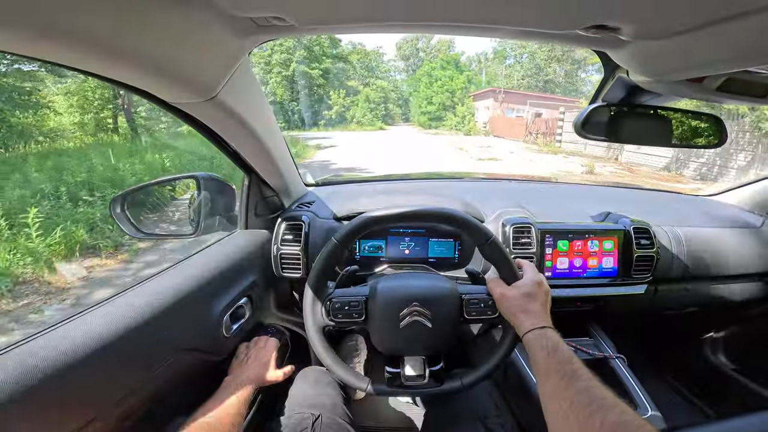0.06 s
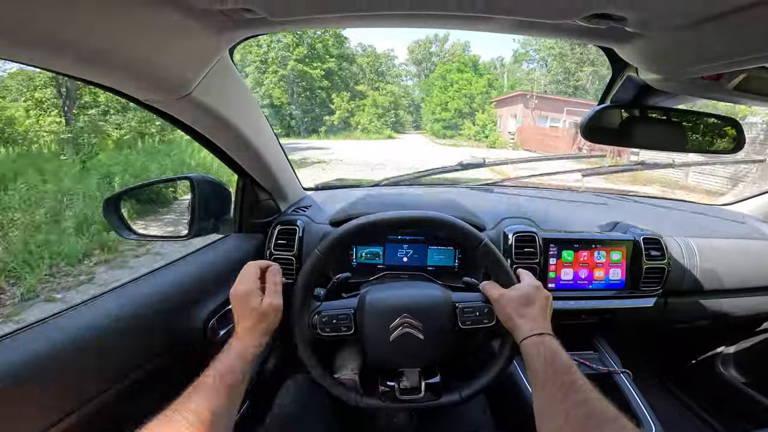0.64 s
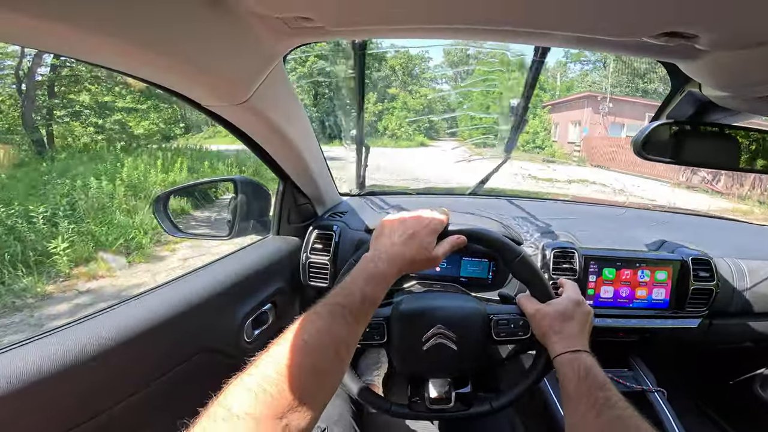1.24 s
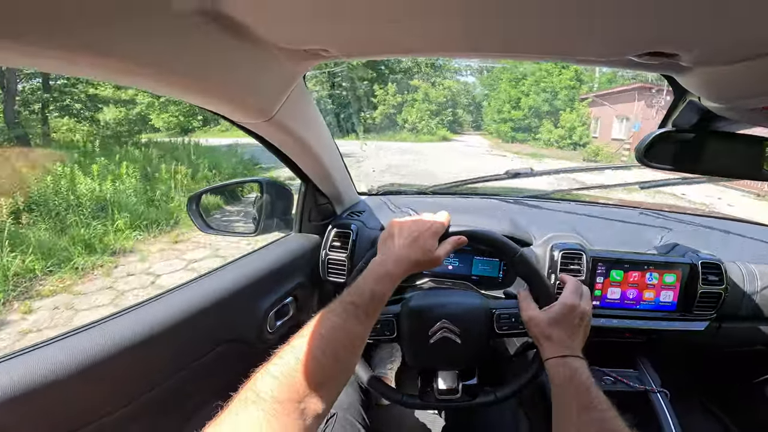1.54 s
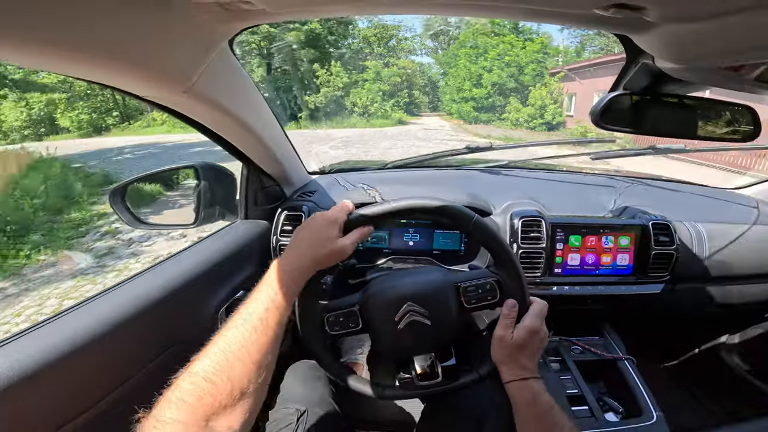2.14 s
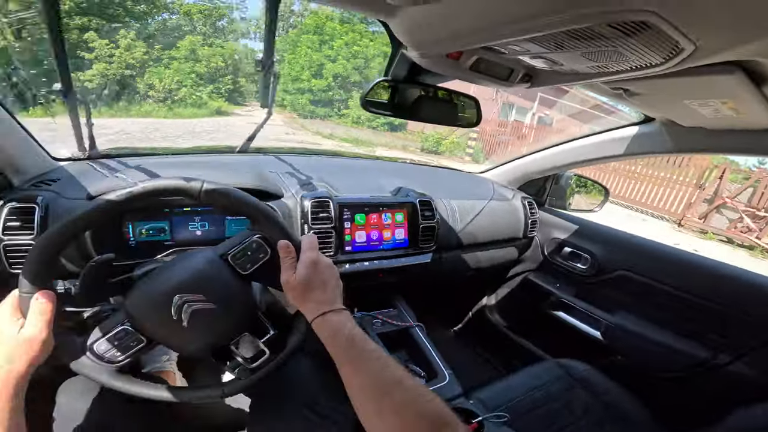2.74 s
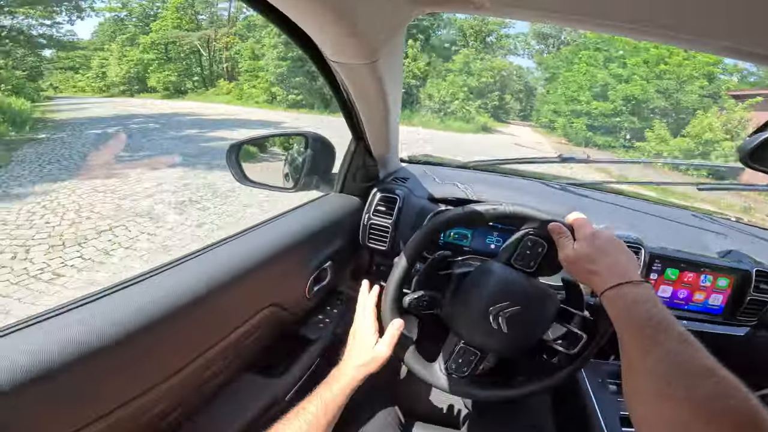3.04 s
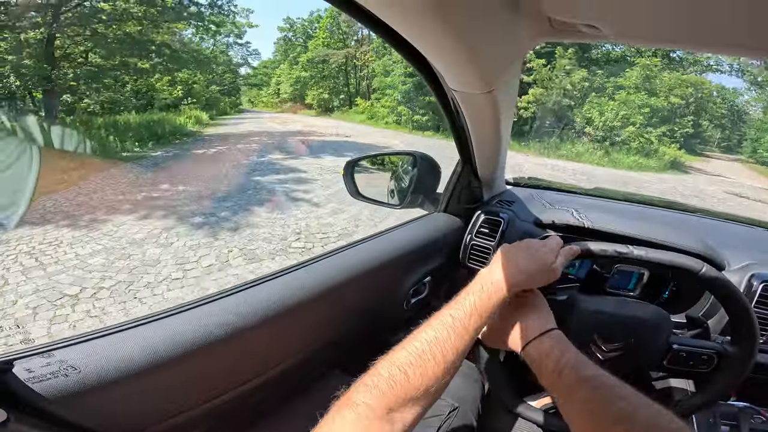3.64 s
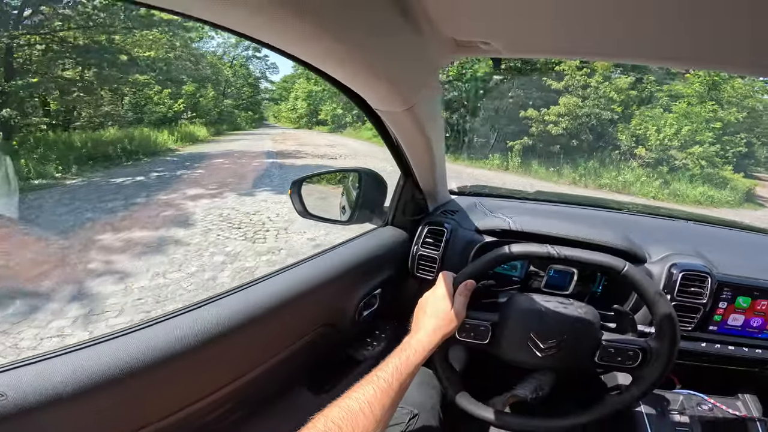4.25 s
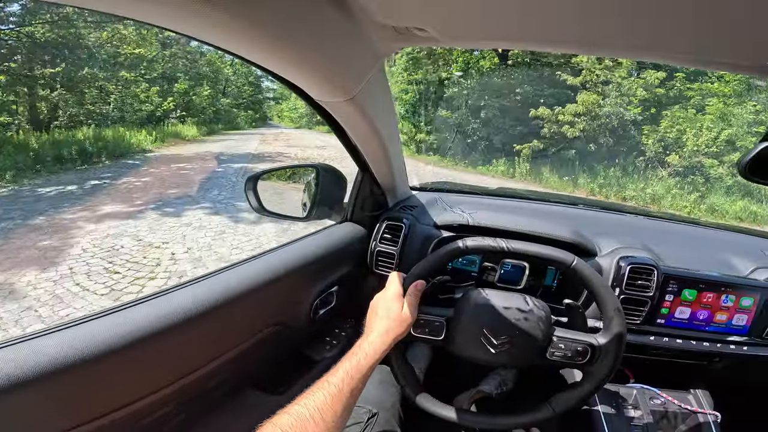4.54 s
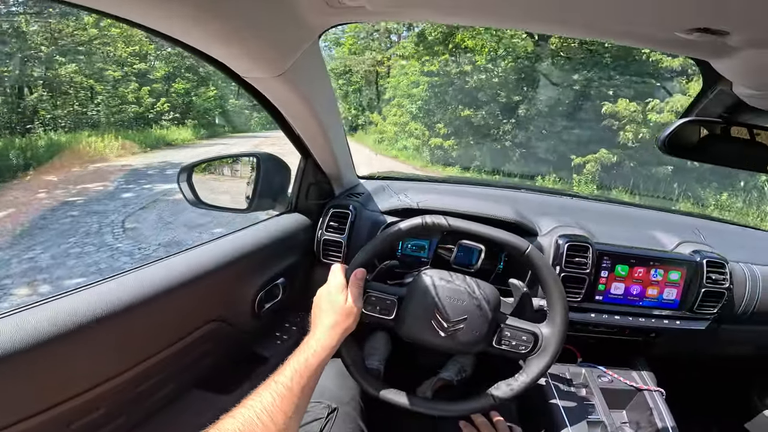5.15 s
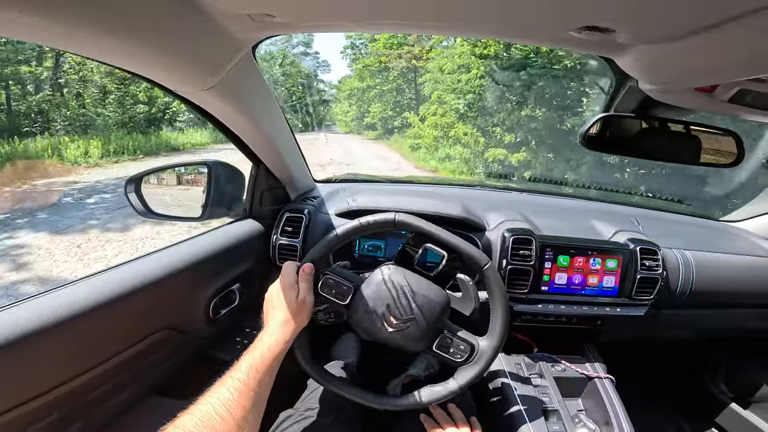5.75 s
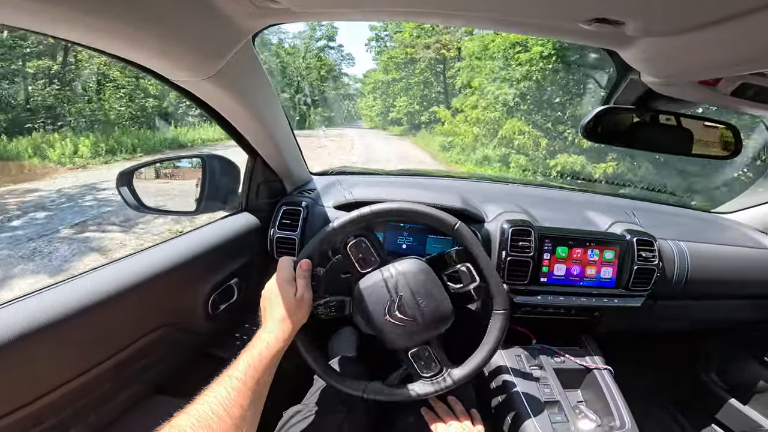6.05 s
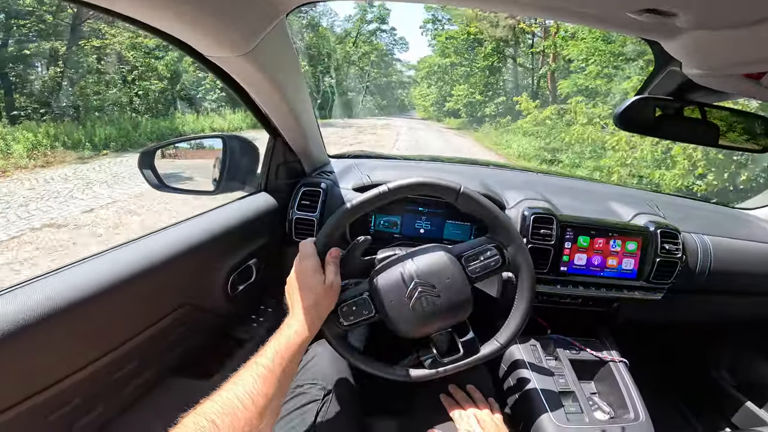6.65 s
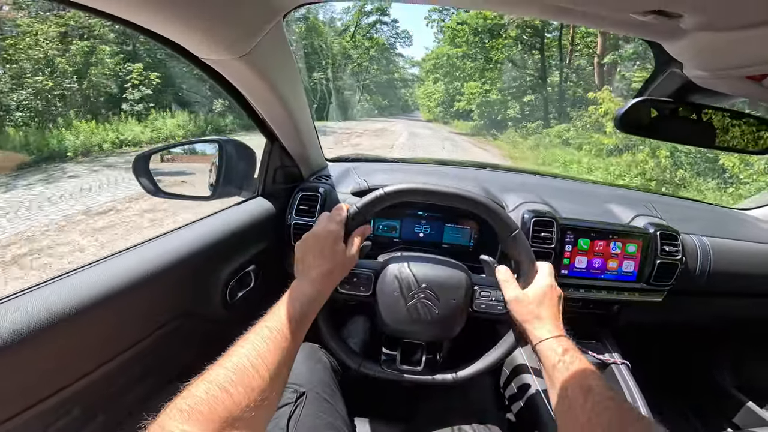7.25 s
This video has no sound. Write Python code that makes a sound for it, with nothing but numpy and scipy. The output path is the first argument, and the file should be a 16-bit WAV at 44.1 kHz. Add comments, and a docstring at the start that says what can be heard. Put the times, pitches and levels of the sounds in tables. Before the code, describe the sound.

Heard from the driver's seat, a car rolls slowly over cobblestones, the tyres drumming and pattering above a deep, heaving body boom. Dull suspension knocks and small plastic clicks and rattles come at the start and return here and there. Midway the turn indicator clicks six times in an even tock-tick. Hands slide softly over the leather steering wheel on and off, and a last bump shakes the trim near the end.

```python
"""Car turning slowly on cobbles, from the driver's seat.

Stones drum through the tyres, knock the suspension and shake the body into a deep boom.
Plastic trim clicks and rattles. The leather steering wheel slides through the driver's hands.
The turn indicator clicks six times behind the dashboard."""
import sys
import numpy as np
from scipy import signal
from scipy.fft import rfft, irfft
from scipy.io import wavfile
from scipy.ndimage import uniform_filter1d, minimum_filter1d

SR = 44100
rng = np.random.default_rng(int(sys.argv[2]) if len(sys.argv) > 2 else 0)


def output_pcm(signal):
    """Save a mono or channel-first signal as 16-bit PCM at the path in sys.argv[1].

    Samples are clipped to [-1, 1] before scaling.
    """
    pcm = np.clip(np.atleast_2d(signal).T, -1, 1) * 32767
    wavfile.write(sys.argv[1], SR, np.round(pcm).astype(np.int16))


N = 321489
TIME, FREQS = np.arange(N) / SR, np.fft.rfftfreq(N, 1 / SR)


def amp(db):
    """Decibels to gain."""
    return 10 ** (np.asarray(db) / 20)


def unit(x):
    """Scale to rms 1."""
    return x / np.sqrt(np.mean(x ** 2) + 1e-20)


def at_hz(points, hz):
    """Interpolate a spectrum over log frequency."""
    f, value = np.transpose(points)
    return np.interp(np.log(hz + 1), np.log(f + 1), value)


def curves(table):
    """Interpolate each column over time."""
    s, *columns = np.transpose(table)
    return [np.interp(TIME, s, c) for c in columns]


def add(mix, s, sound):
    """Mix a sound in at time s."""
    part = mix[..., max(round(s * SR), 0):][..., :sound.shape[-1]]
    part += sound[..., :part.shape[-1]]


def colour(x, spectrum):
    """Filter by a spectrum; rms 1."""
    return unit(irfft(rfft(x) * amp(at_hz(spectrum, FREQS)), N))


def band(centre_hz, octaves, size):
    """Two noise channels through one resonance; rms 1."""
    detune = np.log2((np.fft.rfftfreq(size, 1 / SR) + 1) / centre_hz) / octaves
    return unit(irfft(rfft(rng.standard_normal((2, size))) / (1 + detune ** 4), size))


def wander(rate_hz):
    """Slow random drift; rms 1."""
    return unit(irfft(rfft(rng.standard_normal(N)) * np.exp(-(FREQS / rate_hz) ** 2), N))


def grains(per_s, spread_db):
    """Two trains of tiny, uneven impacts."""
    strength = amp(spread_db * np.minimum(rng.exponential(1, (2, N)), 4))
    return unit(strength * rng.standard_normal((2, N)) * (rng.random((2, N)) < per_s / SR))


def burst(noise, envelope):
    """Enveloped noise, each channel at the envelope's energy."""
    shaped = noise * envelope
    return shaped * np.linalg.norm(envelope) / np.linalg.norm(shaped, axis=1, keepdims=True)


def steady(x, span_s):
    """Level out swells longer than span_s."""
    power = uniform_filter1d(x ** 2, int(span_s * SR) + 1)
    return x / np.sqrt(abs(uniform_filter1d(power, int(span_s * SR / 2) + 1)) + 1e-9)


def mode(t, hz, peak_s, steepness):
    """A resonance that swells to its peak and dies."""
    return (t / peak_s * np.exp(1 - t / peak_s)) ** steepness * np.sin(2 * np.pi * hz * t)


def swells(table, gain_db, size=16384):
    """One soft arch of band noise per row."""
    out, t = np.zeros((2, N)), (np.arange(size) - size / 2) / SR
    for s, length, db, centre_hz, octaves in table:
        inside = abs(t) < length / 2
        noise = unit(band(centre_hz, octaves, size)[:, inside])
        add(out, s - length / 2, amp(db + gain_db) * noise * np.cos(np.pi * t[inside] / length))
    return out


def gestures(table, attack_s, release_s, arch_db, rest_db):
    """Gain curve: each row rises, arches and dies back to a resting level."""
    power = np.full(N, amp(rest_db) ** 2)
    for start, length, db in table:
        rise = np.clip((TIME - start) / attack_s, 0, 1)
        edge = np.clip(2 * (TIME - start) / length - 1, -1, 1) ** 2
        release = np.exp(-np.maximum(TIME - start - length, 0) / release_s)
        power += (amp(db - arch_db * edge) * rise * release) ** 2
    return np.sqrt(power)


# tread hum: t/s, level/dB
HUM_LEVELS = [(0, -56.5), (0.9, -66.5), (2.2, -62.5), (2.5, -56.5), (3.1, -81.5), (4.6, -61.5),
              (5.0, -58.5), (6.0, -57), (7.29, -61.5)]

def tread_hum(centre_hz=600, octaves=0.16):
    """The tread's hollow hum comes and goes as the car pulls away."""
    level_db, = curves(HUM_LEVELS)
    return amp(level_db) * band(centre_hz, octaves, N)


# plastic click, for chatter and knocks: f/Hz, density/dB
CLICK_SPECTRUM = [(300, -25.5), (900, -9.5), (1700, -3), (2400, -2), (2900, 2.5), (4000, -2), (5500, -1.5),
                  (7600, -2), (10000, -11.5), (12500, -17), (14000, -42)]
# rattles: centre t/s, length/s, level/dB
RATTLES = [(0.232, 0.083, -65.5), (0.508, 0.18, -65.5), (7.22, 0.16, -70)]

def trim_chatter(ticks_per_s=900, ring_s=0.00097, dull_hz=4800, size=1024):
    """Loose plastic shakes after jolts: a soft crowd of briefly ringing ticks."""
    shake = sum(amp(db) * np.exp(-(2 * (TIME - s) / length) ** 2) for s, length, db in RATTLES)
    ring = rng.standard_normal((2, size)) * np.exp(-np.arange(size) / SR / ring_s)
    ticks = signal.oaconvolve(grains(ticks_per_s, spread_db=0.8), ring, axes=1)[:, :N]
    dulled = irfft(rfft(colour(ticks, CLICK_SPECTRUM)) / (1 + (FREQS / dull_hz) ** 2), N)
    return shake * unit(dulled)


# trim and wheel knocks: t/s, level/dB, crack t60/s, tilt/(dB/oct), ring f/Hz, ring re crack/dB
TRIM_KNOCKS = [(0.186, -59, 0.06, -9.5, 3900, -11), (0.2183, -53.5, 0.055, -3, 2070, 4),
               (0.226, -58, 0.05, -9, 2330, 4), (0.378, -66, 0.023, 2, 7260, -7),
               (0.451, -39.5, 0.029, -9, 2360, -1.5), (0.46, -56, 0.058, -6, 2280, -5),
               (0.504, -65, 0.044, 18, 3600, -2), (0.5364, -46.5, 0.044, -7.5, 4000, -6),
               (0.575, -65, 0.04, 6, 7160, -8), (2.135, -54, 0.044, -3, 3970, -9),
               (2.391, -52, 0.031, -21, 980, -3), (2.409, -46, 0.042, -18, 1490, -16),
               (2.440, -48.5, 0.025, -11, 1520, -3), (2.731, -52, 0.046, -7.5, 5600, -16),
               (2.849, -56.5, 0.03, 3, 8800, -5), (2.904, -58.5, 0.15, -11, 2196, -1),
               (2.928, -50.5, 0.029, -3, 3288, -17), (2.938, -49, 0.034, -3, 1740, -3),
               (3.11, -61, 0.015, 17, 11700, -10), (3.137, -58, 0.019, 0, 7410, -9),
               (3.96, -53, 0.024, -14, 1410, 1), (3.97, -51, 0.022, -11, 1360, 1),
               (4.492, -63, 0.04, -4, 5538, -8), (4.935, -61.5, 0.062, -1, 7410, -11),
               (4.999, -53, 0.055, -16, 1200, -4), (5.834, -45.5, 0.037, -7.5, 3900, -6.5),
               (5.914, -49, 0.024, -16, 1379, -10), (6.066, -56, 0.035, -14, 2882, -10),
               (6.392, -46, 0.033, -10.5, 2231, -6.5), (7.167, -53, 0.077, -13, 2673, -10),
               (7.178, -59, 0.022, -4.5, 6700, -17), (7.219, -56.5, 0.043, -8, 3484, 0),
               (7.255, -57, 0.037, -4, 3430, -9)]

def trim_knocks(ring_t60_s=0.052, ring_octaves=0.13, tail_db=-19, tail_t60_s=0.15, size=8192):
    """Plastic parts snap together: a crack, a narrow cluster of modes, a faint cabin tail."""
    rise_s, tilt_from_hz = 0.0001, 900
    out, t = np.zeros((2, N)), np.arange(size) / SR
    hz = np.fft.rfftfreq(size, 1 / SR) + 1
    for s, db, t60_s, tilt_db, ring_hz, ring_db in TRIM_KNOCKS:
        shape_db = at_hz(CLICK_SPECTRUM, hz) + tilt_db * np.log2(np.maximum(hz, tilt_from_hz) / ring_hz)
        noise = irfft(rfft(rng.standard_normal((2, size))) * amp(shape_db))
        fade = np.hypot(amp(-60 * t / t60_s), amp(tail_db - 60 * t / tail_t60_s))
        crack = burst(noise, fade)
        ring = amp(ring_db) * burst(band(ring_hz, ring_octaves, size), amp(-60 * t / ring_t60_s))
        add(out, s, amp(db) * (crack + ring) * (1 - np.exp(-t / rise_s)))
    return out


# rubs on the rim: centre t/s, length/s, level/dB, f/Hz, width/oct
RIM_RUBS = [(2.118, 0.05, -63, 3774, 0.52), (2.25, 0.14, -66, 4700, 0.55), (2.44, 0.2, -55, 970, 0.25),
            (2.42, 0.058, -66, 1800, 0.61), (2.742, 0.038, -65, 4360, 0.46), (2.797, 0.02, -52, 1480, 0.5),
            (2.92, 0.03, -58, 2800, 0.9), (3.82, 0.035, -65, 4600, 0.7), (3.98, 0.043, -68, 2000, 0.22),
            (4.09, 0.18, -60, 1411, 0.13), (4.09, 0.076, -60.5, 2030, 0.12), (5.12, 0.22, -68.5, 4300, 0.5),
            (6.22, 0.068, -59, 1780, 0.18), (6.33, 0.12, -58.5, 2900, 0.93), (6.42, 0.04, -65, 3300, 0.5),
            (6.5, 0.04, -65, 4440, 0.37), (7.21, 0.27, -75, 3280, 0.22)]

def rim_rubs():
    """Palms and cuffs rub and creak on the steering wheel."""
    return swells(RIM_RUBS, gain_db=-2)


# skin on leather: f/Hz, density/dB
SKIN_SPECTRUM = [(400, -31.5), (1200, -2.5), (2200, -6), (3200, -2), (4300, -3.5), (5500, -3), (7600, -4),
                 (8400, -10.5), (10300, -14), (11300, -12), (12000, -7), (12700, -12.5), (13700, -26.5)]
# wheel slides: start t/s, length/s, level/dB
WHEEL_SLIDES = [(1.6, 0.83, -66.5), (2.13, 0.33, -56.5), (2.8, 0.27, -66.5), (3.0, 0.65, -70.5),
                (3.72, 0.28, -62.5), (3.94, 0.32, -63), (4.32, 0.15, -71.5), (4.48, 0.14, -67.5),
                (4.97, 0.29, -63), (5.64, 0.62, -59), (6.02, 0.59, -60.5), (6.52, 0.33, -63.5)]

def hands(gain_db=-3.5, grip_db=0.88, air_hz=9000, snags_per_s=29, snag_s=0.005, scrape_hz=2800):
    """Skin slips on leather, airier when faster, and snags on stitching; sleeves rustle in between."""
    slip = gestures(WHEEL_SLIDES, attack_s=0.019, release_s=0.019, arch_db=7.5, rest_db=-72)
    fizz = colour(grains(per_s=14000, spread_db=0.87), SKIN_SPECTRUM)
    air = irfft(rfft(fizz) * (1 - 1 / (1 + (FREQS / air_hz) ** 12)), N)
    air_gain = amp(2) * (slip / slip.max()) ** 0.32
    snags = rng.uniform(0.5, 1, N) * (rng.random(N) < snags_per_s / SR)
    age = np.arange(2048) / SR / snag_s
    snag_envelope = signal.oaconvolve(snags, age * np.exp(-age))[:N]
    scrapes = amp(-11) * unit(snag_envelope * band(scrape_hz, 0.67, N))
    grip = amp(gain_db + grip_db * wander(rate_hz=70))
    return slip * grip * (fizz + (air_gain - 1) * air + scrapes)


# rough patches: centre t/s, length/s, level/dB, f/Hz, width/oct
ROUGH_PATCHES = [(0.14, 0.34, -42.5, 220.6, 0.11), (0.24, 0.13, -48.5, 360, 0.46),
                 (0.24, 0.15, -63, 960, 0.45), (2.94, 0.1, -53, 676, 1), (7.15, 0.11, -49.5, 384, 0.83),
                 (7.17, 0.076, -36, 216, 0.21), (7.17, 0.055, -62, 1201, 0.85)]

def bumps():
    """The suspension takes rough patches with soft swells of noise."""
    return swells(ROUGH_PATCHES, gain_db=4.5)


# strut modes: f/pitch, level/dB, rise/jolt rise
STRUT_MODES = [(0.999, -1.5, 0.89), (1.27, -10, 0.7), (1.72, -12, 0.44), (2.451, -21.5, 0.22)]
# jolts: t/s, level/dB, pitch/Hz, rise/s
STONE_JOLTS = [(0.092, -29.5, 216, 0.023), (0.166, -36, 258, 0.018), (0.208, -37.5, 406, 0.015),
               (0.235, -39.5, 440, 0.01), (0.699, -39, 379, 0.0091), (1.28, -45, 508, 0.006),
               (2.036, -32.5, 269.5, 0.011), (2.54, -35, 317, 0.0088), (7.139, -38, 451, 0.012),
               (7.168, -30, 243.3, 0.016)]

def suspension(gain_db=-1, size=8192):
    """Raised stones knock dully through the rubber mounts; higher modes come and go first."""
    out, t = np.zeros(N), np.arange(size) / SR
    for s, db, hz, peak_s in STONE_JOLTS:
        knock = sum(amp(mode_db) * mode(t, hz * ratio, peak_s * share, steepness=1.1)
                    for ratio, mode_db, share in STRUT_MODES)
        add(out, s, amp(db + gain_db) * knock)
    return out


# modes of the two strokes: f/Hz, level/dB, rise/s, steepness
TICK_MODES = [(445, 11.5, 0.0058, 8.7), (1035, 5.5, 0.0034, 2.2), (1330, -1, 0.0016, 1.4),
              (1700, -12, 0.0019, 3), (3660, -19, 0.0012, 2)]
TOCK_MODES = [(475, 4, 0.0082, 3.9), (550, 8, 0.0092, 1.5), (1037, 10.5, 0.0022, 1.6),
              (1340, 1, 0.0033, 1.4), (1880, -12, 0.002, 1.4), (2640, -15, 0.0013, 1.4)]
# strokes: t/s, level/dB, 0 tick or 1 tock, pitch factor
STROKES = [(2.646, -47.5, 1, 0.97), (3.0456, -40, 0, 0.99), (3.446, -48.5, 1, 1.04),
           (3.8455, -42.5, 0, 0.996), (4.246, -48.5, 1, 1.035), (4.6463, -41.5, 0, 0.99)]

def indicator(snap_db=-13.5, snap_hz=1600, snap_s=0.0021, echo_db=-12, echo_t60_s=0.1, size=3000):
    """Tock and tick alternate: a bright snap, ringing modes, a brief cabin echo."""
    out, t = np.zeros(N), np.arange(size) / SR
    for s, db, is_tock, pitch in STROKES:
        modes = TOCK_MODES if is_tock else TICK_MODES
        snap = amp(snap_db) * band(snap_hz, 0.6, size)[0] * np.exp(-t / snap_s)
        ring = sum(amp(mode_db) * mode(t, hz * pitch, peak_s, steepness)
                   for hz, mode_db, peak_s, steepness in modes)
        add(out, s, amp(db) * (snap + ring))
    tail = rng.standard_normal(4000) * amp(-60 * np.arange(4000) / SR / echo_t60_s)
    return out + amp(echo_db) * signal.oaconvolve(out, tail / np.linalg.norm(tail))[:N]


# road roughness: t/s, drumming/dB, patter/dB
ROUGHNESS = [(0.03, -28, -43), (0.22, -28, -48), (0.45, -28.5, -48), (0.65, -29.5, -48.5),
             (0.88, -31, -53.5), (1.3, -31, -50.5), (1.65, -29.5, -50), (2.03, -26.5, -49),
             (2.25, -28.5, -47.5), (2.7, -32, -49.5), (3.45, -29, -49), (3.75, -33, -51.5),
             (4.1, -30.5, -49.5), (4.65, -30.5, -49.5), (5.1, -29, -50.5), (5.85, -28, -47.5),
             (6.5, -27, -48.5), (6.9, -28, -48), (7.2, -25.5, -44.5)]
# panel drumming and tread patter: f/Hz, density/dB
DRUM_SPECTRUM = [(20, -22.5), (45, -20), (60, -4), (75, -0.5), (86, -2), (97, -2), (112, -8.5), (142, -3.5),
                 (186, -11.5), (207, -16), (222, -18), (300, -24.5), (420, -39), (900, -88)]
TREAD_SPECTRUM = [(130, -25.5), (240, -9.5), (325, 2.5), (385, -4), (510, -9), (590, -17.5), (680, -13),
                  (800, -14), (1030, -15.5), (1500, -21), (2100, -27), (3200, -36), (7000, -48.5),
                  (14000, -67.5)]
# a tyre drops off a stone: centre t/s, bass boost/dB
TYRE_THUDS = [(0.055, 7.5), (0.679, 5), (3.018, 7.5), (3.862, 7.5), (4.29, 6), (4.391, 6), (5.109, 5.5),
              (5.45, 6), (5.66, 4), (6.26, 7), (6.96, 5.5)]

def tyres(drum_db=0.33, tread_db=-1, cavity_db=-13.5, cavity_hz=203, thud_s=0.042, thud_top_hz=148):
    """Stones strike the tyres: panels drum and thud, the air in the tyres drones, the tread patters."""
    drumming_db, patter_db = curves(ROUGHNESS)
    drum = steady(colour(grains(per_s=700, spread_db=0.93), DRUM_SPECTRUM), span_s=0.09)
    bass = irfft(rfft(drum) / (1 + (FREQS / thud_top_hz) ** 8), N)
    thud_db = sum(db * np.exp(-((TIME - s) / thud_s) ** 2) for s, db in TYRE_THUDS)
    thuds = (amp(thud_db) - 1) * bass
    cavity = amp(cavity_db) * steady(band(cavity_hz, 0.06, N), span_s=0.15)
    tread = steady(colour(grains(per_s=9000, spread_db=0.8), TREAD_SPECTRUM), span_s=0.074)
    patter = unit(tread * amp(0.9 * wander(rate_hz=38)))  # stone-to-stone variation
    return amp(drumming_db + drum_db) * (drum + cavity + thuds) + amp(patter_db + tread_db) * patter


# body shudder: f/Hz, density/dB
SHUDDER_SPECTRUM = [(10, -20), (20, 0), (26, 1), (34, -5), (48, 0), (55, -2), (63, -13), (75, -2),
                    (90, -22), (400, -150)]
# body heaves over uneven stretches: start t/s, length/s, level/dB
BODY_HEAVES = [(0.07, 0.58, -13), (1.04, 0.37, -14), (1.68, 0.24, -15.5), (2.36, 0.17, -14.5),
               (2.65, 0.11, -15.5), (2.91, 0.165, -12), (3.39, 0.28, -14), (3.87, 0.12, -20),
               (4.09, 0.13, -14), (4.42, 0.065, -17), (4.56, 0.28, -15.5), (5.02, 0.19, -18),
               (5.33, 0.18, -16), (5.66, 0.046, -13), (5.92, 0.19, -12), (6.26, 0.25, -14),
               (6.68, 0.17, -13), (6.97, 0.32, -15)]

def body_boom(gain_db=-1.2, boom_hz=34.73, sag_hz_per_db=0.5, drift_hz=2.158, flutter_db=0.5):
    """The shuddering body pumps the cabin's lowest resonance, which sags the harder it is driven."""
    drive = gestures(BODY_HEAVES, attack_s=0.0338, release_s=0.03853, arch_db=1.5, rest_db=-24)
    drive_db = 20 * np.log10(drive / drive.max())
    pitch_hz = boom_hz - sag_hz_per_db * drive_db + drift_hz * wander(rate_hz=7)
    envelope = drive * amp(gain_db + flutter_db * wander(rate_hz=14))
    tone = envelope * np.sin(2 * np.pi * np.cumsum(pitch_hz) / SR)
    shudder = amp(-25) * steady(colour(rng.standard_normal(N), SHUDDER_SPECTRUM), span_s=0.15)
    return tone + shudder


# channel likeness: f/Hz, coherence
COHERENCE = [(100, 1), (220, .99), (400, .95), (750, .88), (1100, .86), (2300, .75), (3000, .62),
             (5000, .52), (9000, .35), (11300, .5), (14000, .2)]
# balance: f/Hz, left over right/dB
BALANCE = [(30, 3.5), (110, 4.0), (200, 1.5), (380, -.4), (690, .2), (1280, 2.3), (2360, 3.3), (4360, 4.5),
           (8040, 6.2), (14000, 5.5)]
# phase: f/Hz, left lead/rad
PHASE_LEAD = [(105, 0), (160, -.7), (350, -1.03), (3000, -1.2), (5200, -.15), (10000, -.3), (12000, .15)]

def stereo(diffuse, direct):
    """The cabin sounds alike on both sides in the bass, less so in the treble; the left is louder."""
    mid, side = rfft(diffuse)
    coherence = np.clip(at_hz(COHERENCE, FREQS), 0, 1)
    shared = np.sqrt((1 + coherence) / 2) * mid + rfft(direct)
    apart = np.sqrt((1 - coherence) / 2) * side
    lean = amp(at_hz(BALANCE, FREQS) / 2) * np.exp(0.5j * at_hz(PHASE_LEAD, FREQS))
    return irfft(np.array([(shared + apart) * lean, (shared - apart) / lean]), N)


def scene():
    """Road, hands and trim fill the cabin around the boom, suspension and indicator."""
    road = tyres() + tread_hum() + bumps()
    cabin = hands() + rim_rubs() + trim_knocks() + trim_chatter()
    return stereo(diffuse=road + cabin, direct=body_boom() + suspension() + indicator())


def record(dry, ceiling=0.38, window=1500, cutoff_hz=14000):
    """Look-ahead limiter on the boom's crests, soft ends, low-pass."""
    gain = np.minimum(ceiling / (abs(dry).max(0) + 1e-9), 1)
    limited = dry * uniform_filter1d(minimum_filter1d(gain, window), window)
    faded = limited * signal.windows.tukey(N, 0.001)
    lowpass = signal.firwin(255, cutoff_hz, window=("kaiser", 7), fs=SR)
    return signal.oaconvolve(faded, lowpass[None], "same")


dry = scene()
out = record(dry)
output_pcm(out)
```